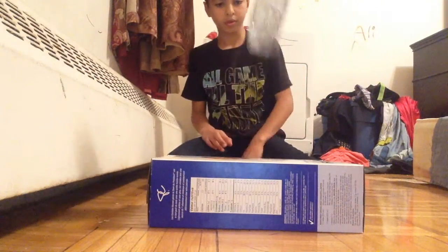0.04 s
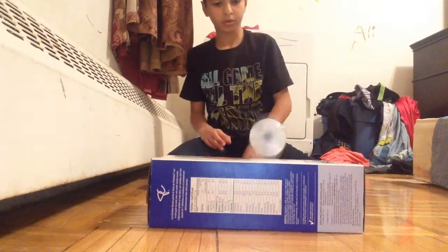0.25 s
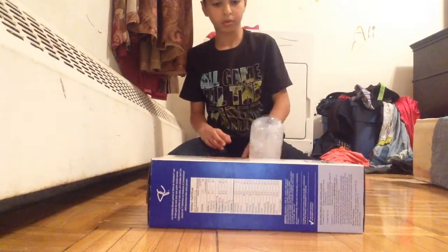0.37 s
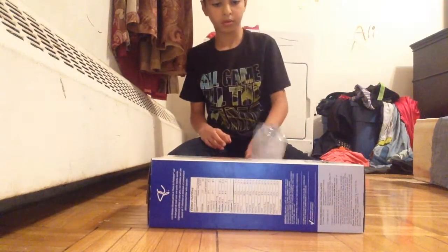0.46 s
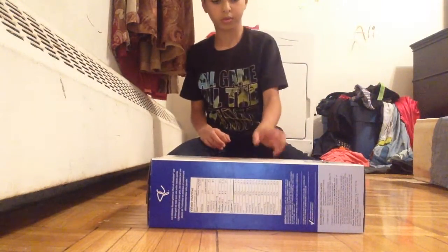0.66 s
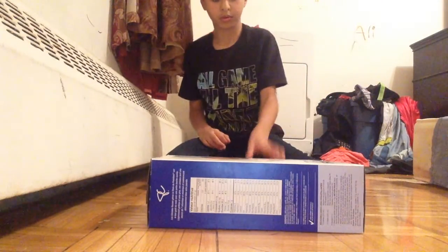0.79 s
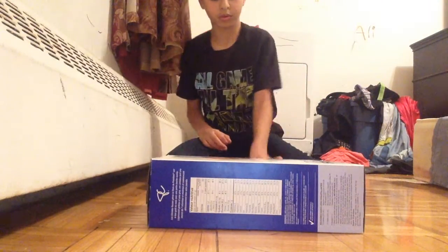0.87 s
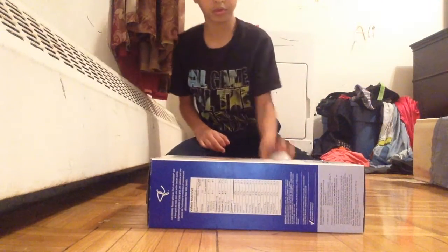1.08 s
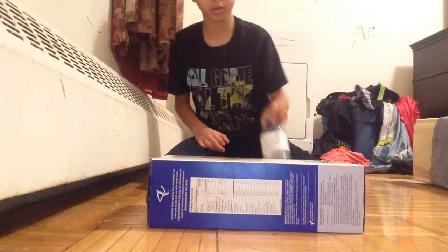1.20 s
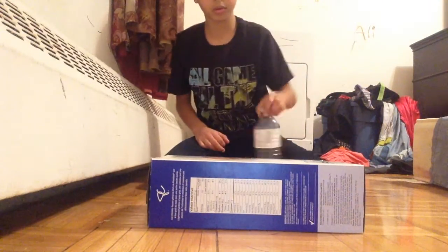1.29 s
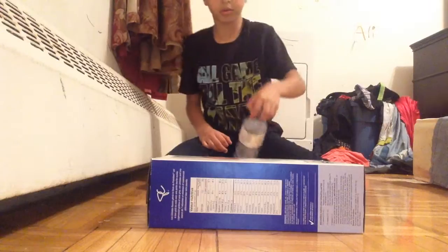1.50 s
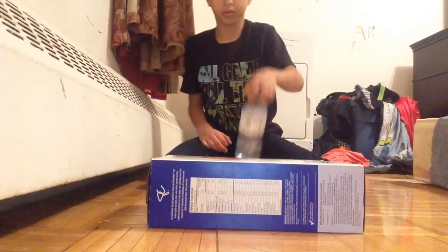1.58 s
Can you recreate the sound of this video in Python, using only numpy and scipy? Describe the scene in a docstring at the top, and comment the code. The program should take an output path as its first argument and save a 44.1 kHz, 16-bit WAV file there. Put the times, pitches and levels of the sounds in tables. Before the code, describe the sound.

A plastic bottle partly filled with water slaps loudly onto a hollow cardboard box at 0.2 s, its wall snapping again at 0.31 s. It thuds onto a wooden floor at 0.41 s, bounces around 0.51 s and clacks at 0.65-0.7 s, water sloshing and gurgling. From about 0.95 to 1.4 s come faint bubbles and soft handling knocks, then near quiet with faint room tone. Small room, floor-level microphone.

```python
"""Over faint room tone, water stirs in a plastic bottle, which lands on a cardboard box at 0.2 s,
tumbles onto a wooden floor at 0.41 s and bounces; near 1 s a hand lifts it, with fainter knocks.
Blows ring damped modes, the wall snaps in noise bursts, sloshes are droplets that also shake the bottle,
its air rings at a moving pitch, and bubbles are short tones. The furnished room is small, its walls
close by; one microphone at floor height saturates softly."""
import sys
import numpy as np
from scipy import signal
from scipy.fft import rfft, irfft
from scipy.io import wavfile
from scipy.ndimage import uniform_filter1d

SR = 44100
rng = np.random.default_rng(int(sys.argv[2]) if len(sys.argv) > 2 else 0)


def gain_from_decibels(decibels):
    """Convert decibel values to linear amplitude factors."""
    exponent = np.asarray(decibels, float) / 20
    return 10 ** exponent


def persist_wave(psi):
    """Save psi, clipped to +-1, as 16-bit WAV."""
    counts = np.round(np.clip(psi, -1, 1) * 32767).astype(np.int16)
    wavfile.write(sys.argv[1], SR, np.atleast_2d(counts).T)


N = 72765
AIR_T60 = 0.13  # s, ring of the air inside the bottle


def evened(x):
    """Scales x to an rms of one."""
    return x / np.sqrt(np.mean(x ** 2) + 1e-20)


def read_curve(points, hz):
    """Reads a curve of (f/Hz, value), straight over log frequency."""
    f, value = np.transpose(points)
    return np.interp(np.log(hz + 1), np.log(f + 1), value)


def add(mix, s, sound):
    """Lays a sound into the mix at s seconds, cut off at the end of the mix."""
    part = mix[round(s * SR):][:len(sound)]
    part += sound[:len(part)]


def coloured(x, points, tilt_db=0):
    """Filters x by a curve in dB; the treble above a knee is tipped by tilt_db per octave."""
    knee_hz = 5000
    hz = np.fft.rfftfreq(len(x), 1 / SR)
    tilt = tilt_db * np.log2(1 + (hz / knee_hz) ** 2) / 2
    return irfft(rfft(x) * gain_from_decibels(read_curve(points, hz) + tilt), len(x))


def room_tone():
    """Steady coloured noise, the hush of the room."""
    # spectrum of the hush: f/Hz, relative density/dB per Hz
    hush_curve = [(30, -8), (70, 10.5), (120, 4), (160, 4), (225, -6.5), (430, -10), (790, -17.5),
                  (2000, -19), (2800, -24), (15500, -30)]
    return gain_from_decibels(-54) * evened(coloured(rng.standard_normal(N), hush_curve))


def droplets():
    """Droplets, a few rising cycles each, mixed with fine spray and evened to a flat spectrum."""
    drops_per_s, spread_db, drop_share = 3500, 3.3, 0.5
    falls = rng.random(N) < drops_per_s / SR
    strength = gain_from_decibels(spread_db * np.minimum(rng.exponential(1, N), 5)) * falls
    kind, drops = rng.integers(0, 30, N), np.zeros(N)
    for k, hz in enumerate(np.geomspace(600, 15000, num=30)):
        cycles = np.arange(0, 5, hz / SR)
        drop = np.sin(2 * np.pi * cycles * (1 + 0.046 * cycles)) * cycles * np.exp(-cycles)
        drops += signal.oaconvolve(strength * (kind == k), drop)[:N]
    spray = rng.standard_normal(N)
    z = rfft(drop_share * evened(drops) + (1 - drop_share) * spray)
    return irfft(z / np.sqrt(uniform_filter1d(abs(z) ** 2, size=400)), N)


def sloshes():
    """Each slosh swells and dies: a splash that is heard and a rough push on the bottle wall."""
    # sloshes: t/s, rise/s, t60/s, splash level above 2 kHz/dB, treble tilt/dB per octave,
    # surge against the wall/dB
    slosh_list = [(0, 0.0013, 0.3, -49.5, 5.5, -48.5), (0.204, 0.036, 0.29, -32, 7, -22.5),
                  (0.284, 0.025, 0.23, -74, 5, -27.5), (0.318, 0.03, 0.23, -38.5, 9, -54),
                  (0.41, 0.0045, 0.53, -40, -25, -24), (0.504, 0.0095, 0.2, -40, -5.5, -31.5),
                  (0.544, 0.026, 0.19, -49.5, 11, -30.5), (0.631, 0.02, 0.51, -61, -15, -34),
                  (0.652, 0.0061, 0.32, -47.5, -4.5, -57), (0.688, 0.02, 0.23, -35.5, -7.5, -44),
                  (.8, 0.087, 0.68, -61, 17, -51), (0.929, 0.023, 0.73, -60, -0.5, -75),
                  (1.05, 0.02, 0.88, -65, 2, -60.5), (1.135, 0.046, 0.18, -57.5, 2.5, -49),
                  (1.217, 0.034, 0.29, -61, -4, -60), (1.254, 0.04, 0.29, -52.5, 10, -53),
                  (1.36, 0.022, 0.7, -78, 11.5, -62)]
    # spectrum of a splash before tilt: f/Hz, relative density/dB per Hz
    splash_curve = [(290, -13.5), (500, -8.5), (769, -8), (1130, -11), (1310, -18), (1670, -13),
                    (7450, -23), (9110, -30.5), (14000, -29.5), (15500, -32)]
    water, t = droplets(), np.arange(N) / SR
    splash, push_power = np.zeros(N), np.zeros(N)
    treble = signal.butter(2, 2000, "high", fs=SR, output="sos")
    for s, rise, t60, db, tilt_db, surge_db in slosh_list:
        swell = np.clip((t - s) / rise, 0, 1)
        shape = swell * gain_from_decibels(-60 * np.maximum(t - s - rise, 0) / t60)
        sound = coloured(water, splash_curve, tilt_db)
        splash += gain_from_decibels(db) * shape * sound / signal.sosfilt(treble, sound).std()
        push_power += (gain_from_decibels(surge_db) * shape) ** 2
    build_up = AIR_T60 * SR / (4 * np.log(1000))  # power gain of the air mode on steady noise
    surge = np.sqrt(push_power / build_up) * rng.standard_normal(N)
    return splash, surge


def ring(force, modes):
    """Every mode answers the force with a dying sine; dying noise stands for the modes in between."""
    longest_t60, most_cycles = 0.07, 30  # s; card, boards and wet plastic are all well damped
    dense_db, dense_t60 = -6, 0.03  # crowd of unresolved modes, s
    t = np.arange(SR // 2) / SR
    body = np.zeros(len(t))
    for hz, db, t60 in modes:
        damped_t60 = min(t60, longest_t60, most_cycles / hz)
        body += gain_from_decibels(db - 60 * t / damped_t60) * np.sin(2 * np.pi * hz * t)
    outline = [(60, -35)] + [row[:2] for row in modes] + [(6000, -29)]
    crowd = evened(coloured(rng.standard_normal(len(t)), outline))
    dense = crowd * gain_from_decibels(dense_db - 60 * t / dense_t60)
    return signal.oaconvolve(force, body + dense)[:N]


def air(force):
    """The air inside rings as one mode, retuned and muffled as the water moves."""
    # path of the air mode: t/s, f/Hz, level/dB
    air_path = [(0, 290, -3), (.2, 329, 0), (.28, 318, 8), (.39, 323, -3), (.41, 248, 1.5), (.5, 257, 0),
                (.56, 293.5, 0.5), (.6, 327.4, 13.5), (.69, 344.6, -5), (.82, 341.7, 3), (.95, 357, -1),
                (1.02, 330, -4), (1.05, 302, 0.5), (1.3, 304.6, 1.5), (1.65, 324, -7)]
    s, hz, db = np.transpose(air_path)
    t = np.arange(N) / SR
    spin = np.exp(2j * np.pi * np.cumsum(np.interp(t, s, hz)) / SR)
    decay = np.exp(-np.log(1000) / (AIR_T60 * SR))
    # a leaky sum in a frame that turns with the pitch
    ringing = spin * signal.lfilter([1], [1, -decay], force / spin)
    return gain_from_decibels(np.interp(t, s, db)) * ringing.imag


def blows(hits, column):
    """Half-sine pushes of equal area at equal level; a longer contact is duller."""
    force = np.zeros(N)
    for row in hits:
        contact_s = row[3] / 1000
        push = np.sin(np.pi * np.arange(0, 1, 1 / (contact_s * SR)))
        add(force, row[0], gain_from_decibels(row[column]) * push / push.sum())
    return force


def knocks(surge):
    """Box, floor and bottle ring from each blow; surging water keeps shaking the bottle and the boards."""
    # blows on box and floor: t/s, blow on the surface/dB, blow on the bottle/dB, contact/ms
    box_hits = [(.2026, -15.5, -23, 0.17), (.2040, -5, -10, 1.35), (.2075, -11.5, -21, 0.62),
                (.2125, -18, -4, 2.32), (.2180, -10.5, -43.5, 0.56), (.2215, -5.5, -18, 1.43),
                (.3125, -27, -27, 0.32), (.3195, -23.5, -19, 1.47)]
    floor_hits = [(.4110, -9, -23, 0.35), (.4140, -6, -28, 0.68), (0.4183, -6.5, -28, 1.73),
                  (0.4234, -17, -52, 0.5), (0.512, -23, -22.5, 2.1), (0.643, -53, -30.5, 0.3),
                  (0.6546, -63, -31, 0.35), (0.688, -47.5, -22.5, 0.26), (.692, -51, -20, 0.33),
                  (0.6964, -65, -16, 0.27), (0.702, -64, -13.5, 0.65), (.952, -64, -52, 0.25),
                  (.994, -56, -50.5, 0.32), (1.041, -51, -44, 1.7), (1.139, -50, -43, 0.31),
                  (1.147, -40.5, -48, 2.6), (1.164, -42, -71, 2.1), (1.178, -42, -58, 2.9),
                  (1.262, -51, -75, 0.52), (1.302, -71, -60, 0.81)]
    # modes of card, boards and bottle wall: f/Hz, level/dB, t60 before the damping limits/s
    box_modes = [(210, -3.5, 0.042), (318, -8, 0.028), (427, -3, 0.12), (467.5, -10, 0.04),
                 (545, -16, 0.063), (650, -2, 0.035), (715, 0.5, 0.017), (833, -0.5, 0.029),
                 (993, 1.5, 0.048), (1111, -8, 0.016), (1230, -12.5, 0.034), (1630, -17, 0.02),
                 (2070, -2, 0.03), (2530, -3.5, 0.01)]
    floor_modes = [(140, -15.5, 0.047), (198.5, -3.5, 0.062), (240, -1, 0.026), (373, -1.5, 0.024),
                   (468.6, -1.5, 0.026), (521, -2, 0.04), (675, -7, 0.023), (786, -12, 0.02),
                   (1036, -1, 0.0061), (1257, -3, 0.0068), (1367, 2, .014), (1668, -5, 0.013),
                   (2140, -8.5, 0.01), (2760, -6.5, 0.017)]
    bottle_modes = [(566, -2.5, 0.067), (776, 0, 0.04), (1076, -3, 0.024), (1360, -7.5, 0.014),
                    (1773, -11.5, 0.0079), (2234, -12.5, 0.061), (2650, -19.5, .015)]
    floor_surge_db, wall_surge_db = -10, -8.5
    wall_cut_hz = 380  # Hz; the ring of the bottle wall carries little below this

    on_bottle = blows(box_hits + floor_hits, column=2)
    wall = ring(on_bottle + gain_from_decibels(wall_surge_db) * surge, bottle_modes)
    wall = signal.lfilter(*signal.butter(2, wall_cut_hz, "high", fs=SR), wall)
    box = ring(blows(box_hits, column=1), box_modes)
    boards = ring(blows(floor_hits, column=1) + gain_from_decibels(floor_surge_db) * surge, floor_modes)
    return -(box + wall + air(on_bottle + surge) + boards)


def snaps():
    """The plastic wall snaps: short noise bursts with a hard front and an exponential decay."""
    # snaps: t/s, level/dB, decay to 1/e/ms, treble tilt/dB per octave
    snap_list = [(0.009, -40.5, 4.9, -14), (0.0728, -48, 6.8, -31), (0.2018, -13.5, 2.55, 5.5),
                 (0.2106, -21, 3.2, 11.5), (0.3128, -11.5, 3.4, 6.5), (0.333, -26.5, 3.3, -10),
                 (0.346, -28, 9.1, -12), (0.4108, -16.5, 1.5, -7), (.501, -39, 4.3, 6),
                 (0.5188, -21.5, 3.1, 1.5), (0.6522, -26.5, 2.4, -31), (0.6982, -17, 0.92, -11),
                 (0.711, -49, 5.2, -6), (1.139, -47, 2, 13), (1.266, -48, 2.5, 0),
                 (1.1712, -55.5, 1.8, 5.5), (1.622, -49.5, 2.2, 8.5)]
    # spectrum of a snap before tilt: f/Hz, relative density/dB per Hz
    snap_curve = [(470, -25), (1000, -16), (1600, -3.5), (2000, 0), (2470, 3), (2750, 3.5), (3100, 2.5),
                  (3450, -2), (3750, 2.5), (4300, -3.5), (5400, -8), (6070, -10), (6800, -10.5),
                  (8500, -15), (11000, -10.5), (14200, -13), (15500, -11)]
    out, t = np.zeros(N), np.arange(1536) / SR
    for s, db, ms, tilt_db in snap_list:
        noise = evened(coloured(rng.standard_normal(2048), snap_curve, tilt_db))[512:]
        shape = np.minimum(t / 0.0005, 1) * np.exp(-t / (ms / 1000))
        add(out, s, gain_from_decibels(db) * shape * noise)
    return out


def room(x):
    """Four bright echoes off near surfaces, and sparse taps dying band by band."""
    # reverberation: f/Hz, t60/s
    room_decay = [(150, 0.54), (500, 0.44), (2000, 0.17), (6000, 0.57), (11000, 0.086), (15000, 0.27)]
    # near surfaces: echo delay/s, and echo level before the low cut/dB
    wall_delays = [.0117, .021, .028, .037]
    wall_levels = [-9, -13, -18, -17]
    tail_db = -13
    wall_hz = 880  # small hard surfaces return little below this

    taps, echoes = np.zeros(SR), np.zeros(SR // 20)
    at = np.arange(500, SR - 20, 20) + rng.integers(0, 20, (SR - 501) // 20)
    taps[at] = rng.choice([-1., 1.], at.shape)
    hz, t, z = signal.stft(taps, SR, nperseg=512)
    fade = gain_from_decibels(-60 * t / read_curve(room_decay, hz)[:, None])
    tail = signal.istft(z * fade, SR, nperseg=512)[1]
    response = gain_from_decibels(tail_db) * tail / np.linalg.norm(tail)
    for delay, db in zip(wall_delays, wall_levels):
        add(echoes, delay, gain_from_decibels([db]))
    add(response, 0, signal.lfilter(*signal.butter(1, wall_hz, "high", fs=SR), echoes))
    return signal.fftconvolve(x, response)[:N]


def bubbles():
    """Single bubbles: soft-starting tones that die and rise in pitch, shaken by the moving water."""
    # bubbles: t/s, level/dB, f/Hz, t60/s, rise as a share of the pitch/per s
    bubble_list = [(.618, -36.5, 862, 0.21, 1.4), (.652, -13, 977, 0.033, 2.9),
                   (.955, -43, 1580, 0.05, 0.68), (.99, -38, 650, 0.042, 0.51),
                   (.996, -36.5, 914, 0.047, 0.8), (1.085, -40, 867, 0.041, 1.2),
                   (1.29, -45, 742, 0.11, 0.81), (1.37, -42, 947, 0.04, 2.6)]
    wobble_share = 0.09  # rms, as a share of the pitch
    out, t = np.zeros(N), np.arange(SR // 5) / SR
    for s, db, hz, t60, rise in bubble_list:
        noise = rng.standard_normal(len(t))
        wobble = wobble_share * evened(uniform_filter1d(noise, size=90))
        turns = np.cumsum(hz * (1 + rise * t + wobble)) / SR
        shape = gain_from_decibels(db - 60 * t / t60) * np.minimum(t / 0.0071, 1)
        add(out, s, shape * np.sin(2 * np.pi * turns))
    return out


def scene():
    """Bottle, box, floor and water sound in the room, over its tone."""
    splash, surge = sloshes()
    bottle = splash + knocks(surge) + snaps() + bubbles()
    return (bottle + room(bottle) + room_tone())[None]


def low_pass(x):
    """Removes everything above the highest recorded frequency."""
    return signal.sosfilt(signal.butter(12, 16480, fs=SR, output="sos"), x)


def record(dry):
    """The microphone path cuts the lows, saturates softly towards a ceiling and limits the band."""
    low_cut_hz, edge_hz, ceiling = 165, 15450, 0.72
    low_cut = signal.butter(4, low_cut_hz, "high", fs=SR, output="sos")
    cut = signal.sosfilt(low_cut, dry)
    soft = cut / (1 + (cut / ceiling) ** 4) ** 0.25
    band = signal.firwin(511, edge_hz, window=("kaiser", 9), fs=SR)
    finished = signal.oaconvolve(soft, band[None], "same")
    return low_pass(finished)


dry = scene()
out = record(dry)
persist_wave(out)
```